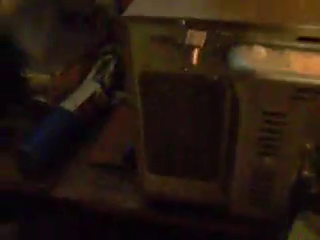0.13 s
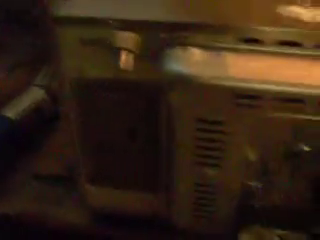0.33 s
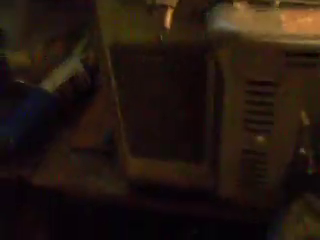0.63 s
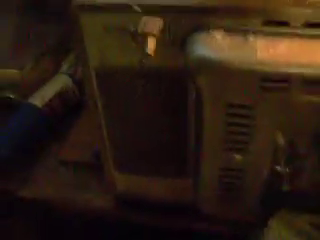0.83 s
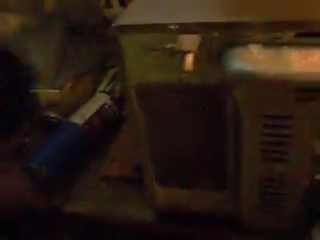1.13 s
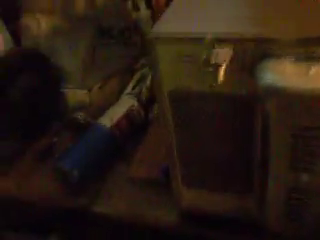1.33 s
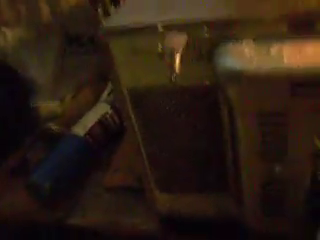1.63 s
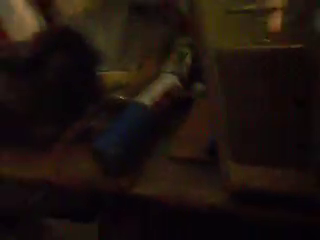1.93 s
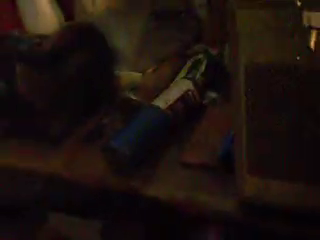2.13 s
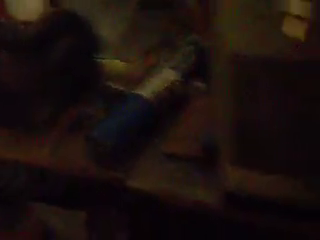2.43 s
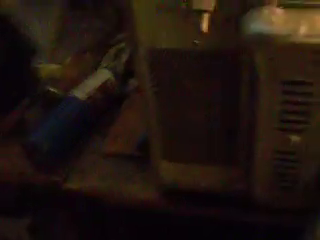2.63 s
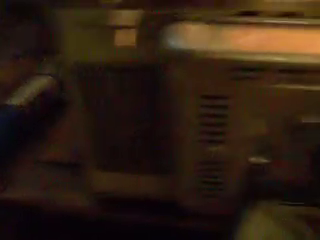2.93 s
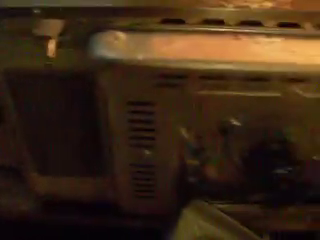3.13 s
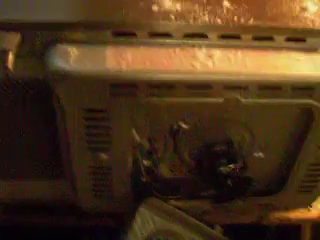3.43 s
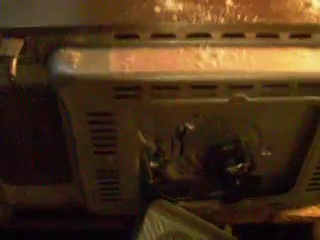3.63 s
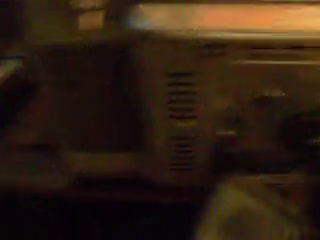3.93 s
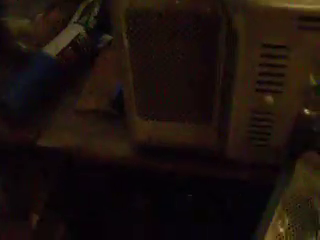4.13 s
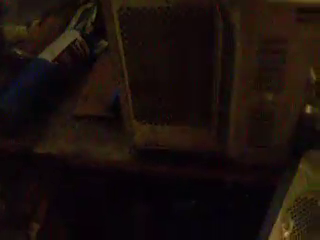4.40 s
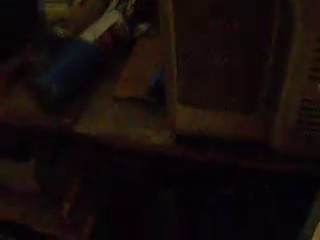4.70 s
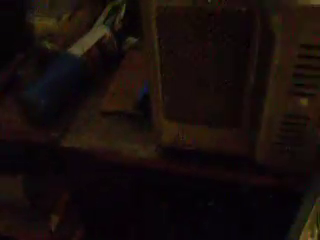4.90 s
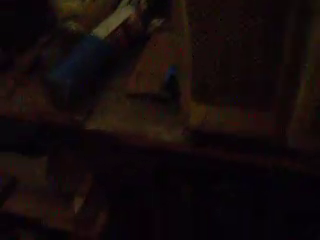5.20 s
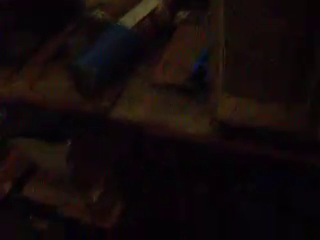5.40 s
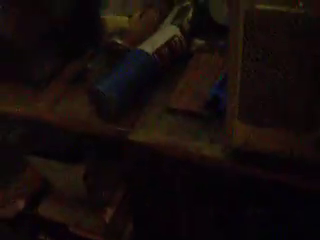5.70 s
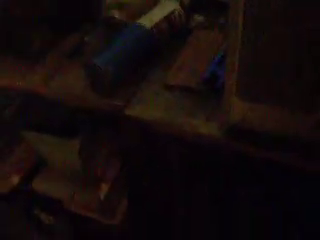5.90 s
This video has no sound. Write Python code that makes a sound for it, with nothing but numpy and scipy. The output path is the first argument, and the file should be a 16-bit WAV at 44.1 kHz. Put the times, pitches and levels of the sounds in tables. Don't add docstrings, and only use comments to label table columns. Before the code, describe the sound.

A sledgehammer pounds a hollow sheet-metal appliance in a small shed, heard close through a cheap, muffled microphone that overloads into crunchy distortion. It begins with a previous blow still ringing and parts knocking until about 0.4 s, where a part lands with a soft ping. Blows fall at roughly 0.6, 1.25, 1.95, 2.6, 3.2, 3.9, 4.65 and 5.35 s. Each is an abrupt steel crack and cabinet boom, followed by a rattle of panels and tin dying within a second. Those at 1.25 and 1.95 are harshest; 2.6 shakes the floor most, while 3.2 is weaker but heavy. A faint tin sliver spins down in pitch near 1.75. Bright knocks and pings come at 2.1 and 2.5, with sharp rebounds near 3.4, 3.8, 4.9 and 5.25. Scraps tick throughout over low room noise; last clatter ends around 6 s.

```python
import sys
import numpy as np
from scipy import signal
from scipy.fft import rfft, irfft, next_fast_len
from scipy.io import wavfile

SR = 44100
rng = np.random.default_rng(int(sys.argv[2]) if len(sys.argv) > 2 else 0)


def makeup_ratio(level_db):
    decades = np.asarray(level_db, float) / 20
    return 10 ** decades


def wav_record(signal):
    frames = np.transpose(np.atleast_2d(signal))
    bounded = np.clip(frames, -1, 1)
    quanta = np.round(bounded * 32767).astype(np.int16)
    wavfile.write(sys.argv[1], SR, quanta)


N = 266981

# (time [s], force above the camera's limit [dB], time for that extra to die [s],
# floor thump [dB], rattle t60 [s])
BLOWS = [
    (-.05, 7, 0.036, -34, 0.4),
    (0.5948, 18, 0.099, -6, 0.9),
    (1.2498, 24.5, .07, -12, 0.91),
    (1.9585, 23.5, 0.078, -21, 0.73),
    (2.6035, 12, 0.11, -3, 0.89),
    (3.2271, 11, 0.1, -7, 0.79),
    (3.9236, 17.5, 0.059, -27.5, 0.96),
    (4.6470, 17, 0.076, -18, 1),
    (5.3393, 22.5, 0.087, -12, 0.76),
]
# (panels above tin [dB], boom above tin [dB], time for cabinet to follow tin [s])
LANDINGS = [(0, 0, .005), (0, -5, .003), (-2.5, -6.5, .006), (1.5, -3, 0.058), (0, -5, .003),
            (0.5, -5, 0.016), (3, -2.5, .004), (0.5, -4, 0.0026), (2, -4.5, .004)]
RATTLE_DB = -5
# (tin [dB], panels [dB], boom [dB])
STEEL_DB = (9.5, 2, 3.5)
STEEL_S = 0.018

# (time [s], tin level [dB], t60 [s], panels above tin [dB], boom above tin [dB])
JOLTS = [(.032, -9, 0.14, 2, 0), (.092, -17, 0.67, 3.5, -4), (.132, -11.5, 0.36, -1.5, -2),
         (0.4143, -11, 0.31, -34, -55), (.902, -18.5, 0.28, -1.5, -17), (1.103, -29, 0.28, 3, -1),
         (1.152, -26.5, 0.23, -1, -2), (2.125, -10.5, .6, -14, -4.5), (2.314, -21.5, 0.24, 4.5, -3),
         (2.463, -14.5, 0.31, -20, -40), (2.906, -24.5, 0.54, -4, 1.5), (3.0550, -20, 0.36, 0.5, -0.5),
         (3.151, -31, 0.62, -3, 3.5), (3.398, -9.5, .26, -3, -0.5), (3.545, -27.5, 0.75, 0, 1),
         (3.787, -13, 0.17, 4, -6.5), (4.200, -28, 0.2, -12, -1), (4.353, -19.5, 0.093, 2, -0.5),
         (4.5950, -29.5, 0.35, -3.5, -20), (4.893, -12.5, 0.34, -7, -3), (5.256, -14.5, 0.17, 7, 1),
         (5.589, -23.5, 0.67, -8.5, -4), (5.790, -30.5, 0.67, -4.5, -9), (5.973, -22.5, 0.34, 4, -1.5)]
# (time [s], tin level [dB], t60 [s], panels above tin [dB], boom above tin [dB])
STIRS = [(.745, -3, 0.21, -3.5, -8.5), (.875, -19.5, 0.22, 2, -2), (.935, -26, 0.16, 0, -11),
         (1.050, -33.5, 0.5, -3, -4.5), (1.385, -13.5, 0.19, -1, 2.5), (1.451, -22.5, 0.77, 2, 5.5),
         (1.650, -38, 0.38, -3, 4), (2.255, -22.5, 0.52, 2.5, 3), (2.385, -25, 0.38, -4.5, -0.5),
         (2.770, -11, 0.36, -5, -2), (2.988, -27, 0.19, -2, -2), (3.490, -15.5, 0.21, 1, -2),
         (3.680, -38, 0.65, -12, 9), (3.778, -24, .1, 1, -10), (4.106, -13, 0.18, -7, -6),
         (4.375, -36, 0.41, -3, 6.5), (4.620, -29, .2, -7, -16), (4.810, -10.5, 0.48, -14, -10),
         (5.055, -24, 0.32, -2.5, 5.5), (5.126, -32, 0.44, -1, 3), (5.190, -29.5, 0.15, 2, 6),
         (5.219, -31.5, 0.17, 6, -4), (5.460, -12, 0.21, 0, 1), (5.737, -30.5, 0.28, 2.5, -1)]
# (tin [s], panels [s], boom [s])
JOLT_SWELL_S = (0.0016, 0.0028, .01)
# (tin [s], panels [s], boom [s])
STIR_SWELL_S = (0.0046, 0.011, 0.0099)
LINGER = (1, .97, 1.56)
SETTLE_S = 0.47

# (frequency [Hz], level [dB per Hz])
METAL_COLOUR = [(15, -61), (25, -50), (153, -1.5), (331, -9), (401, -6.5), (446, -12.5), (614, -1),
                (683, -8.5), (1210, -11.5), (1320, -9.5), (1710, -12.5), (2160, -10), (2620, -13),
                (3460, -8), (4100, -32.5), (5330, -52.5), (9020, -120)]
# (frequency [Hz], width [Hz], level [dB])
CABINET = [(162, 16, -38.5), (202, 25, 1), (287.4, 19, -3), (324, 16, -9.5), (398.7, 16, 4), (526.5, 12, 1),
           (595.8, 31, 4.5), (640.3, 41, 2), (744, 29, -5.5), (823.8, 13, 0.5), (979, 27, -5),
           (1056.5, 9.9, -10), (1163, 11, -11.5), (1426, 33, -12), (1272, 47, -13.5), (1562, 75, -7),
           (1940, 53, -15), (2057, 30, -4.5), (2166, 5.3, -15), (2420, 7.7, -10), (2807, 90, -0.5),
           (3033, 3.3, -11), (3255, 22.3, -16.5), (3266, 54, 7.5), (3330, 42, -13), (3435, 38, 3.5),
           (3440, 21, 0), (3570, 43, -9.5), (3622.5, 90, 11.5)]

# (time [s], peak [dB], ringing pitch [Hz], t60 [s], dull thud above the ring [dB])
KNOCKS = [(0.0324, 8.5, 3640, 0.043, -15.5), (0.0922, -3, 3080, 0.16, -20.5),
          (0.1344, 9.5, 3250, 0.043, -3.5), (0.4163, 1.5, 3650, 0.051, -24),
          (0.8774, -2.5, 3430, 0.048, -23), (0.8960, -20, 3280, 0.081, 14.5),
          (1.0655, -16, 2224, 0.21, -8.5), (1.1059, -17, 1364, 0.14, -12),
          (1.1888, -20, 2190, 0.066, -30.5), (1.4244, 8, 3550, 0.022, 3), (1.4776, -14.5, 3520, 0.14, -6.5),
          (1.8998, -27.5, 3350, 0.43, -17), (2.1256, 9.5, 3280, 0.039, -10), (2.3171, -16, 3430, 0.029, 0),
          (2.4699, 0.5, 3303, 0.05, -38), (3.0650, -3.5, 3440, 0.06, -12), (3.4005, 2, 2430, 0.061, -15),
          (3.7888, 7.5, 3460, 0.062, -38.5), (4.3656, -3, 3160, 0.037, -10.5),
          (4.8978, 13, 3410, 0.033, -34), (5.2565, 6, 3400, 0.047, -11), (5.5897, -6, 3330, 0.062, -17),
          (5.791, -23, 2600, 0.33, -12), (5.9751, -1.5, 1306, 0.047, -17)]
# (time [s], peak [dB], dull thud above the ring [dB])
SCRAPS = [(0.2943, -16, -6), (0.3400, -20.5, -19), (0.9394, -6.5, -18), (1.1514, -13.5, -22),
          (1.4980, -17, -8), (2.209, -21.5, -14), (2.2523, -12.5, -2.5), (2.39, -13.5, -4),
          (2.9083, -8.5, -4.5), (2.9343, -16.5, 1), (2.9896, -18, -12.5), (3.1515, -20.5, -1),
          (3.5034, -13, -20), (3.6074, -23, -2.5), (4.2524, -16, -15), (4.4308, -23.5, -2),
          (4.5966, -21, -11), (5.6314, -15.5, 1)]
SCRAP_HZ, SCRAP_T60 = 3430, 0.14

# (time [s], peak [dB], t60 [s])
PINGS = [
    (.418, -16.5, 0.12),
    (2.127, -8.5, .15),
    (2.470, -10.5, 0.117),
    (5.815, -38, .3),
]
# (frequency [Hz], level [dB])
BRACKET = [(2848, -11), (3130, 2), (3303, -1.5), (3467, -12.5), (3760, -8)]
# (start [s], end [s], first pitch [Hz], last pitch [Hz], level [dB])
SLIVER = (1.715, 1.835, 3300, 3204, -36.5)
# (pitch against the main ring [ratio], level [dB])
SLIVER_RINGS = [(.929, -9), (1, -1.5), (1.071, -8)]

# (frequency [Hz], t60 [s])
SHED_ECHO = [(100, 1), (600, 0.15), (2000, 0.9), (4000, 0.31)]
# (frequency [Hz], level [dB per Hz])
HUSH_COLOUR = [(15, -27.5), (25, -15.5), (70, 1), (98, 2), (465, -12), (810, -10), (1600, -27),
               (3380, -13.5), (4100, -19.5), (5330, -64.5), (9020, -120)]
HUSH_DB = -43
# (frequency [Hz], gain [dB])
CAMERA_FILTER = [(3450, 0), (3650, -3.5), (3800, -3), (3900, -5), (4000, -14.5), (4150, -47.5), (4600, -59)]
CAMERA_RATE, LIMIT = 8000, 0.707


def evened(x):
    return x / np.sqrt(np.mean(x ** 2) + 1e-20)


def read(points, hz):
    f, value = np.transpose(points)
    return np.interp(np.log(hz + 1), np.log(f + 1), value)


def coloured(x, gain):
    size = next_fast_len(len(x))
    return irfft(rfft(x, size) * gain(np.fft.rfftfreq(size, 1 / SR)), size)[:len(x)]


def resonate(x, hz, width, rate=SR):
    turn = np.exp(2j * np.pi * np.cumsum(hz * np.ones(len(x))) / rate)
    r = np.exp(-np.pi * width / rate)
    return 2 * (turn * signal.lfilter([1 - r], [1, -r], x / turn)).real


def add(mix, s, sound):
    part = mix[round(s * SR):][:len(sound)]
    part += sound[:len(part)]


def causal(points, size=8192):
    log_gain = np.log(makeup_ratio(read(points, abs(np.fft.fftfreq(size, 1 / SR)))))
    return np.fft.ifft(np.exp(np.conj(signal.hilbert(log_gain)))).real[:size // 4]


def hush():
    def gain(hz):
        return makeup_ratio(read(HUSH_COLOUR, np.minimum(hz, 3500))) * (hz < CAMERA_RATE / 2)

    return makeup_ratio(HUSH_DB) * evened(coloured(rng.standard_normal(N), gain))


def shed(x):
    echoes = np.zeros(SR // 2)
    at = np.arange(200, len(echoes) - 20, 20) + rng.integers(0, 20, (len(echoes) - 201) // 20)
    echoes[at] = rng.choice([-1., 1.], at.shape)
    hz, t, z = signal.stft(echoes, SR, nperseg=256)
    fade = makeup_ratio(-60 * t / read(SHED_ECHO, hz)[:, None])
    tail = signal.istft(z * fade, SR, nperseg=256)[1]
    return signal.fftconvolve(x, tail / np.linalg.norm(tail))[:N]


def sliver(width_hz=12):
    start, end, first_hz, last_hz, db = SLIVER
    count = round((end - start) * SR)
    out = np.zeros(N)
    noise = rng.standard_normal(SR // 4)[:count]
    hz = np.linspace(first_hz, last_hz, count)
    for ratio, ring_db in SLIVER_RINGS:
        ring = evened(resonate(noise, ratio * hz, width_hz))
        add(out, start, makeup_ratio(db + ring_db) * np.hanning(count) * ring)
    return out


def pings(spread_db=3, detune=0.004, rise_s=0.00071):
    out, t = np.zeros(N), np.arange(SR // 3) / SR
    lucks = rng.standard_normal((len(PINGS), len(BRACKET), 2))
    for (s, peak_db, t60), luck in zip(PINGS, lucks):
        modes = 0
        for (hz, db), (louder, sharper) in zip(BRACKET, luck):
            tone = np.sin(2 * np.pi * hz * (1 + detune * sharper) * t)
            modes = modes + makeup_ratio(db + spread_db * louder) * tone
        add(out, s, makeup_ratio(peak_db - 60 * t / t60) * (1 - np.exp(-t / rise_s)) * modes)
    return out


def metal_gain(hz, flat_hz=3500):
    return makeup_ratio(read(METAL_COLOUR, np.minimum(hz, flat_hz)))


def knocks(crack_s=0.0066, crack_db=-2, crack_low_hz=705, thud_hz=620, rise_s=0.0013):
    def crack_gain(hz):
        return metal_gain(hz) * (hz < CAMERA_RATE / 2) * hz ** 2 / (hz ** 2 + crack_low_hz ** 2)

    out, t = np.zeros(N), np.arange(SR // 4) / SR
    scraps = [(s, peak_db, SCRAP_HZ, SCRAP_T60, thud_db) for s, peak_db, thud_db in SCRAPS]
    for s, peak_db, hz, t60, thud_db in KNOCKS + scraps:
        ring_noise, thud_noise, crack_noise = rng.standard_normal((3, len(t)))
        width = 70 if hz < 2400 else 750
        ring = evened(resonate(resonate(ring_noise, hz, width), hz, width))
        thud = makeup_ratio(thud_db) * evened(resonate(thud_noise, thud_hz, 200))
        crack = makeup_ratio(crack_db) * evened(coloured(crack_noise, crack_gain)) * np.exp(-t / crack_s)
        body = (ring + thud) * makeup_ratio(-60 * t / max(t60, 0.01))
        add(out, s, makeup_ratio(peak_db - 7) * (1 - np.exp(-t / rise_s)) * (body + crack))
    return out


def thumps(top_hz=90, t60=0.22, rise_s=0.024):
    def gain(hz):
        return (hz > 18) / np.sqrt(1 + (hz / top_hz) ** 4)

    t = np.arange(N) / SR
    shudder = evened(coloured(rng.standard_normal(N), gain))
    level = 0
    for s, _, _, db, _ in BLOWS:
        u = np.maximum(t - s, 0)
        level = level + makeup_ratio(db - 60 * u / t60) * (1 - np.exp(-u / rise_s))
    return shudder * level


def rattle(t, swell_s, s, tin_db, t60, panel_db, boom_db):
    u = np.maximum(t - s, 0)
    loss_db = 60 * u / max(t60, 0.02) + 10 * (u / SETTLE_S) ** 2
    db = tin_db + np.c_[[0, panel_db, boom_db]] - loss_db / np.c_[list(LINGER)]
    swell = 1 - np.exp(-u / np.c_[list(swell_s)])
    return u, (makeup_ratio(db) * swell) ** 2


def shake_levels(step=40):
    t = np.arange(0, N, step) / SR
    power = sum(rattle(t, JOLT_SWELL_S, *row)[1] for row in JOLTS)
    power = power + sum(rattle(t, STIR_SWELL_S, *row)[1] for row in STIRS)
    for (s, force_db, extra_s, _, t60), (panel_db, boom_db, follow_s) in zip(BLOWS, LANDINGS):
        swell_s = (JOLT_SWELL_S[0], follow_s, follow_s)
        u, tail = rattle(t, swell_s, s, RATTLE_DB, t60, panel_db, boom_db)
        extra_db = force_db * np.exp(-(u / extra_s) ** 2)
        steel_db = np.c_[list(STEEL_DB)] * np.exp(-u / STEEL_S)
        power = power + tail * makeup_ratio(extra_db + steel_db) ** 2
    return [np.interp(np.arange(N) / SR, t, level) for level in np.sqrt(power)]


def cabinet_rings(taps, dent=0.0067, wander_db=4.0, wander_s=0.07):
    slow = signal.resample_poly(taps, 1, 5)
    rate = SR / 5
    t = np.arange(len(slow)) / rate
    hits = sorted(row[0] for row in BLOWS + JOLTS)
    hit = np.searchsorted(hits, t)
    knots = np.arange(0, N / SR + 1, wander_s)
    out = 0
    for hz, width, db in CABINET:
        tune, touch = rng.standard_normal(len(hits) + 1), rng.standard_normal(400)
        touch_db = wander_db * np.interp(t, knots, touch[:len(knots)])
        mode = resonate(slow * makeup_ratio(touch_db), hz * (1 + dent * tune[hit]), width, rate)
        out = out + makeup_ratio(db) * evened(mode)
    return evened(signal.resample_poly(out, 5, 1)[:N])


def clatter(taps_per_s=1500, spread_db=0.76, buzz_db=-3, ring_db=-5, smear_t60=0.056,
            low_hz=950, high_hz=2600):
    chance, size = rng.random(N), rng.exponential(1, N)
    sign, buzz = rng.choice([-1., 1.], N), rng.standard_normal(N)
    taps = sign * makeup_ratio(spread_db * np.minimum(size, 2.5)) * (chance < taps_per_s / SR)
    taps = evened(taps) + makeup_ratio(buzz_db) * buzz
    fade = makeup_ratio(-60 / smear_t60 / SR) ** 2
    bursts = np.sqrt(signal.lfilter([1], [1, -fade], taps ** 2)) * rng.standard_normal(N)
    wash = evened(coloured(bursts, metal_gain))
    metal = wash + makeup_ratio(ring_db) * cabinet_rings(taps)

    def below(hz, edge_hz):
        return 1 / (1 + (hz / edge_hz) ** 8)

    tin = coloured(metal, lambda hz: np.sqrt(1 - below(hz, high_hz)) * below(hz, 4100))
    panels = coloured(metal, lambda hz: np.sqrt(below(hz, high_hz) * (1 - below(hz, low_hz))))
    boom = coloured(metal, lambda hz: np.sqrt(below(hz, low_hz)))
    return sum(evened(part) * level for part, level in zip((tin, panels, boom), shake_levels()))


def scene():
    parts = knocks()
    echoes = makeup_ratio(-11) * shed(parts)
    return (clatter() + thumps() + parts + echoes + hush() + sliver() + pings())[None]


def band_limit(x):
    return signal.sosfilt(signal.butter(12, 16850, fs=SR, output="sos"), x)


def record(dry):
    up, down = SR // 100, CAMERA_RATE // 100
    guarded = signal.fftconvolve(dry[0], causal(CAMERA_FILTER))[:N]
    wide = signal.firwin(8 * up + 1, 6000, fs=SR * down)
    coarse = np.clip(signal.resample_poly(guarded, down, up, window=wide), -LIMIT, LIMIT)
    smooth = signal.firwin(32 * up + 1, 3990, window=("kaiser", 9.0), fs=SR * down)
    fine = signal.resample_poly(np.r_[coarse, 0], up, down, window=smooth)[:N]
    wrapped = (fine + 2 * LIMIT) % (4 * LIMIT) - 2 * LIMIT
    clipped = np.clip(wrapped, -LIMIT, LIMIT)
    edge = signal.firwin(121, 15900, window=("kaiser", 3), fs=SR)
    return band_limit(signal.fftconvolve(clipped, edge, "same")[None])


dry = scene()
out = record(dry)
wav_record(out)
```